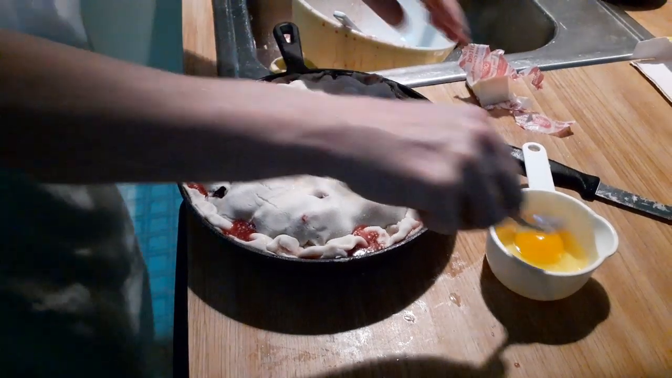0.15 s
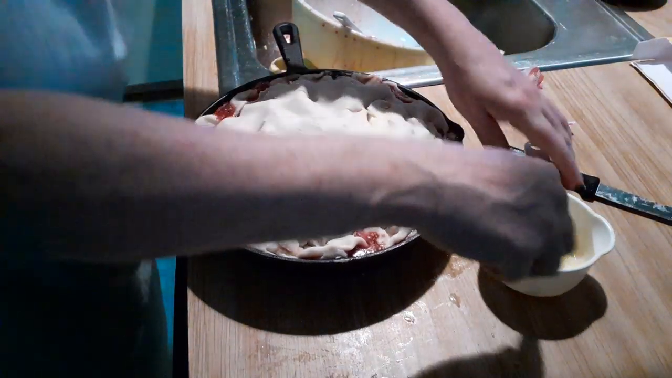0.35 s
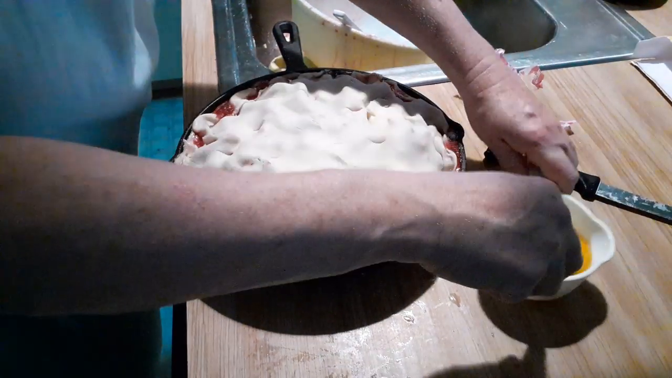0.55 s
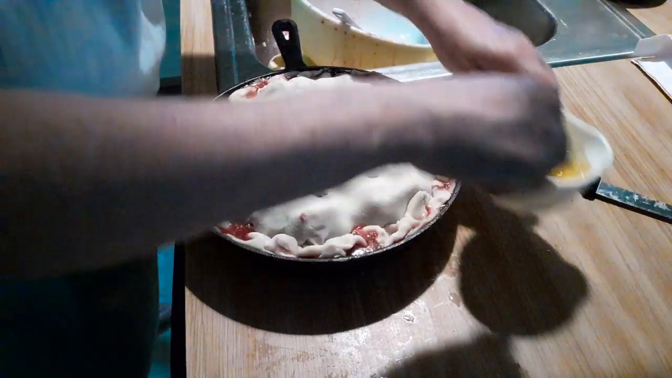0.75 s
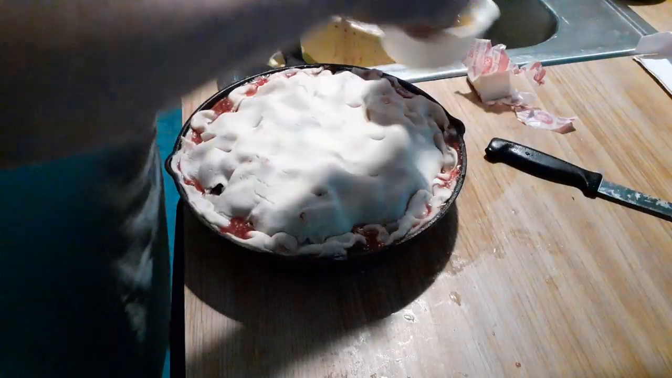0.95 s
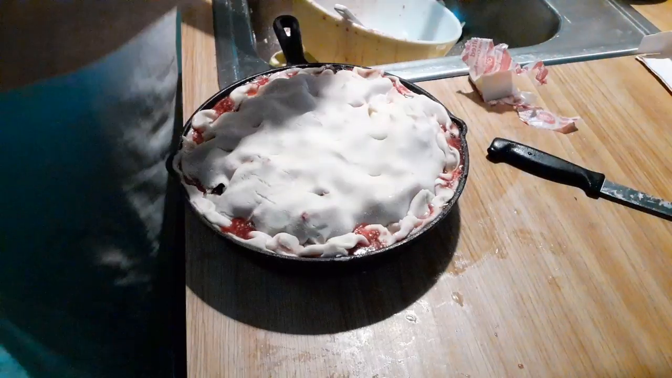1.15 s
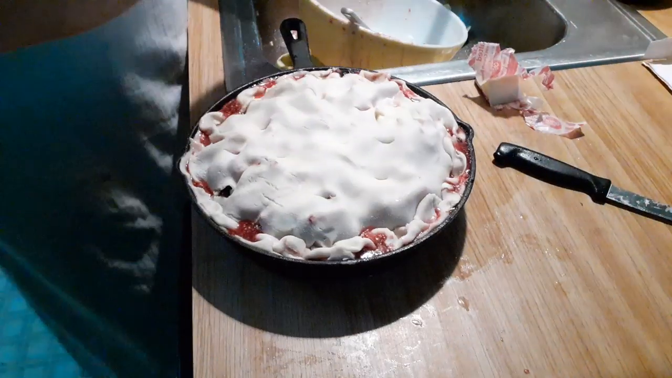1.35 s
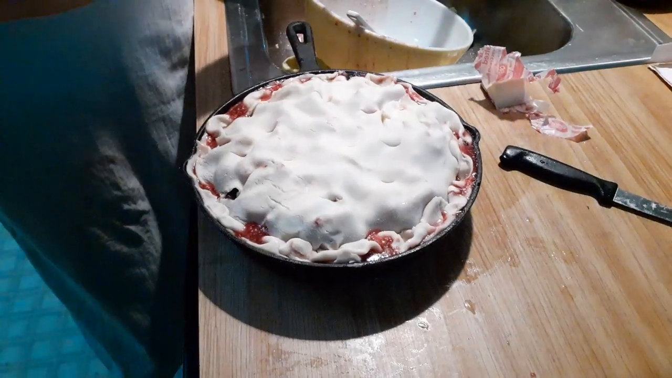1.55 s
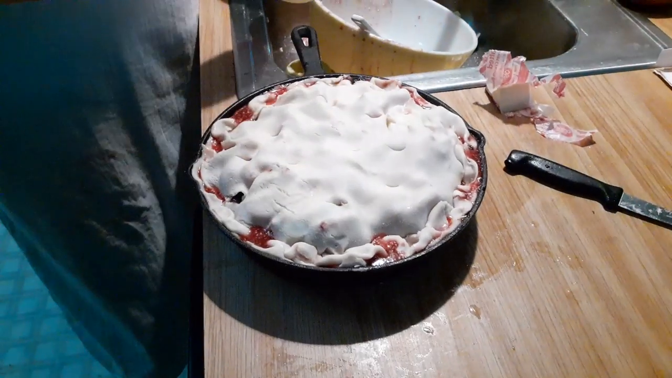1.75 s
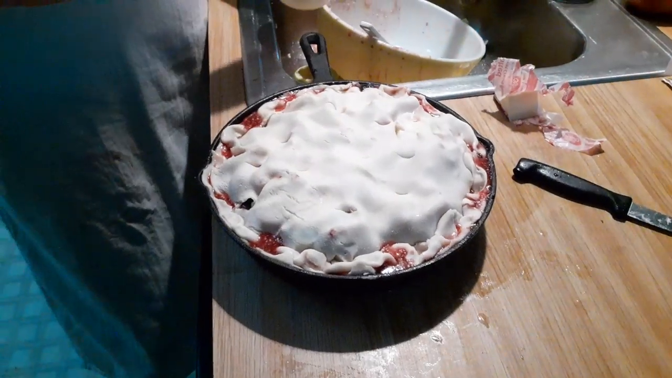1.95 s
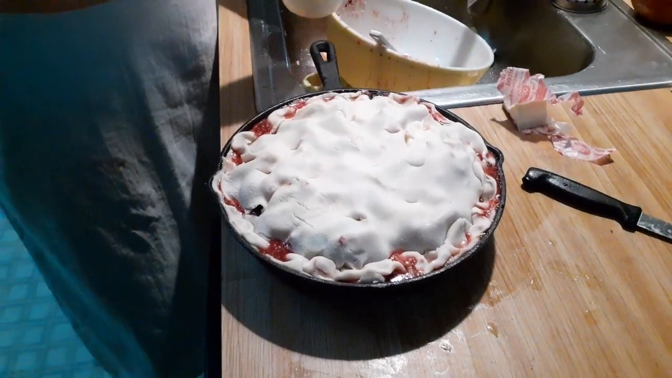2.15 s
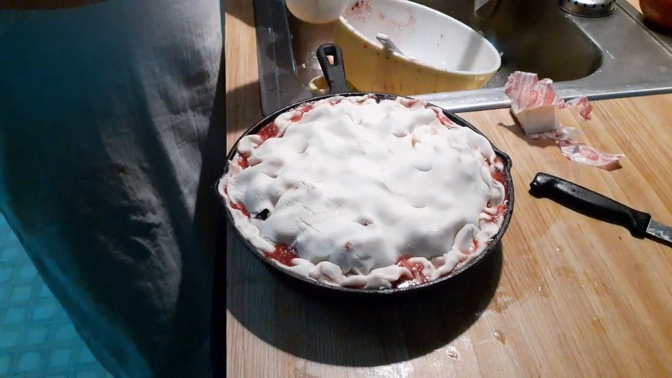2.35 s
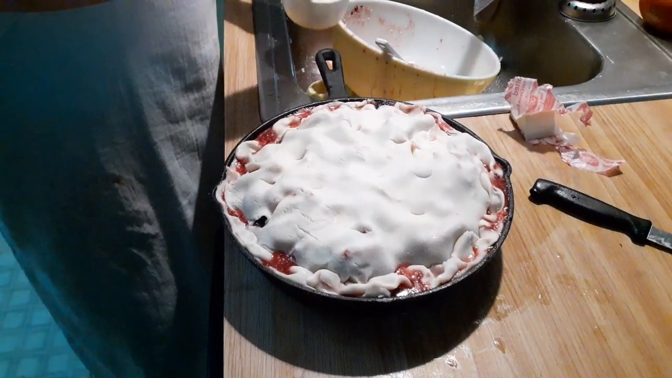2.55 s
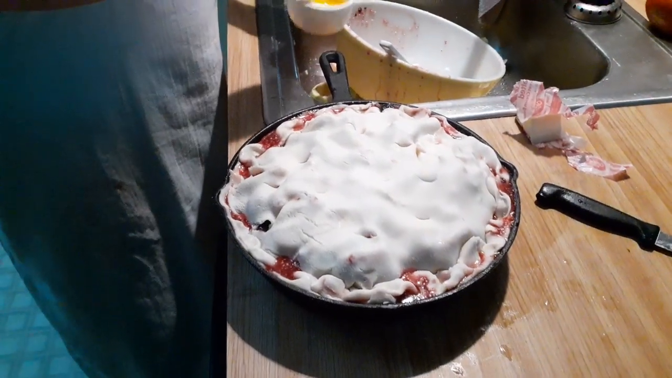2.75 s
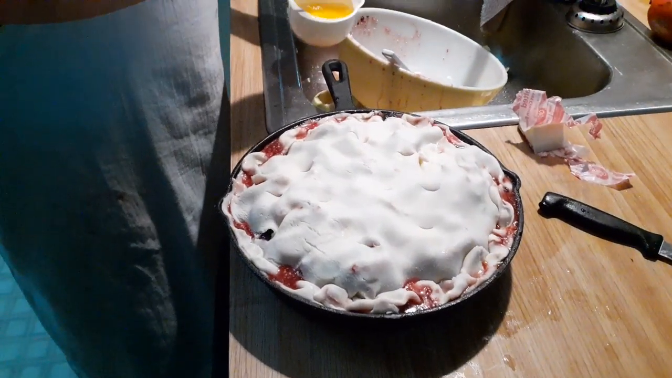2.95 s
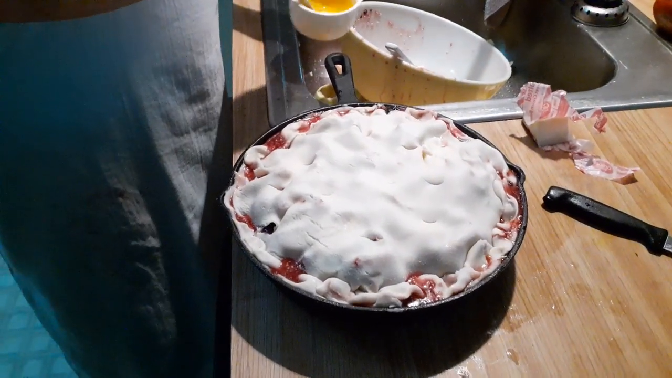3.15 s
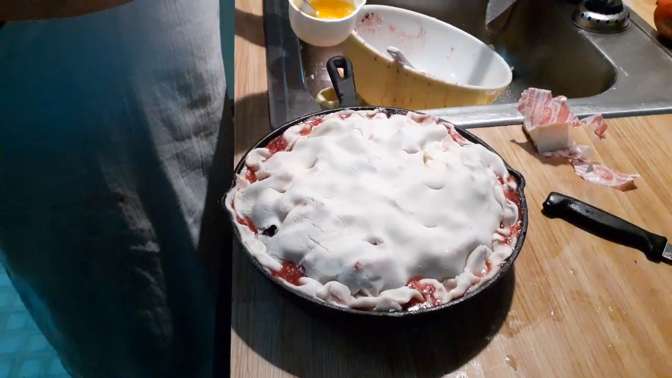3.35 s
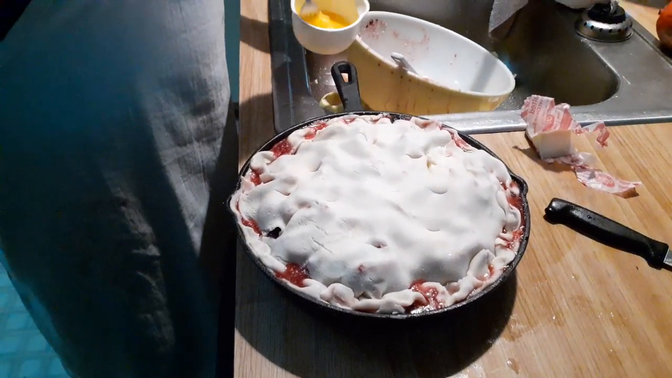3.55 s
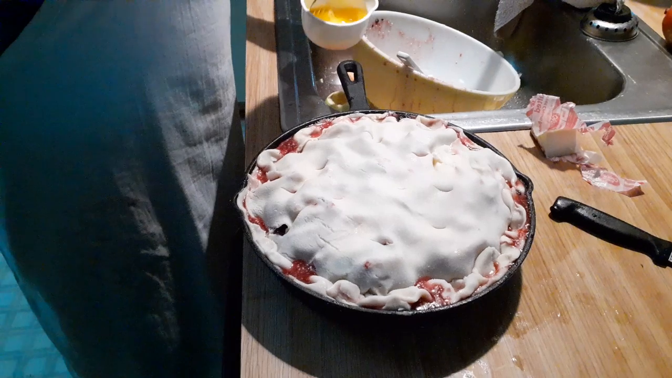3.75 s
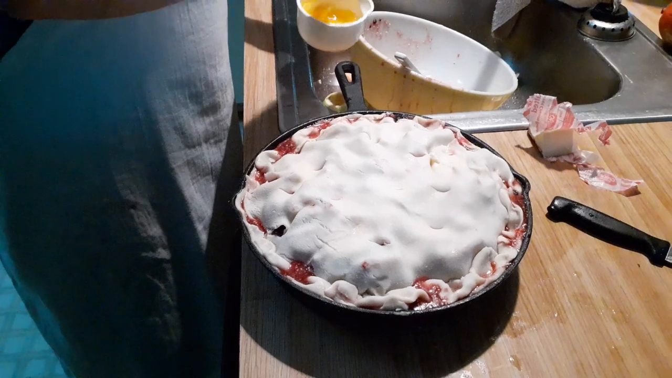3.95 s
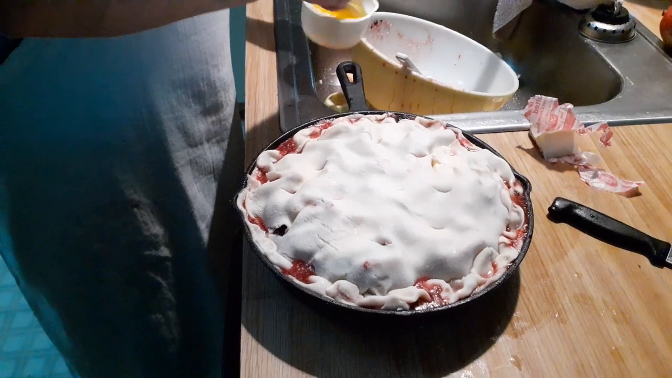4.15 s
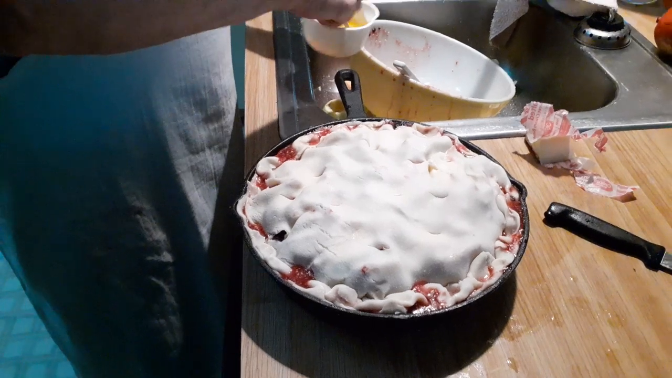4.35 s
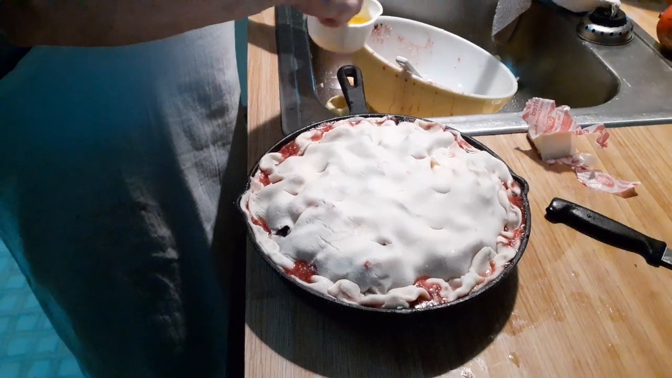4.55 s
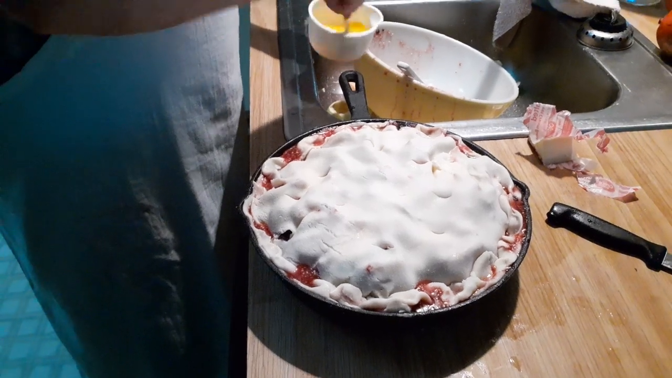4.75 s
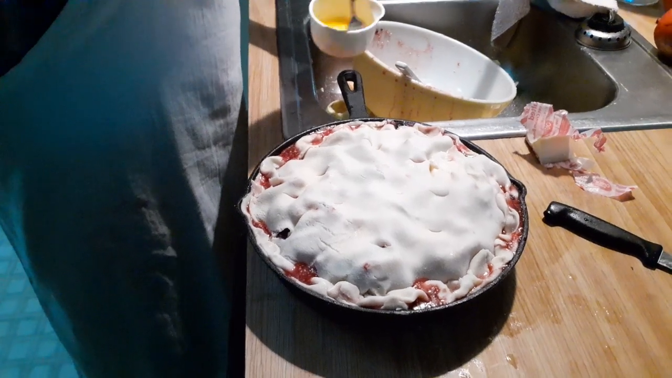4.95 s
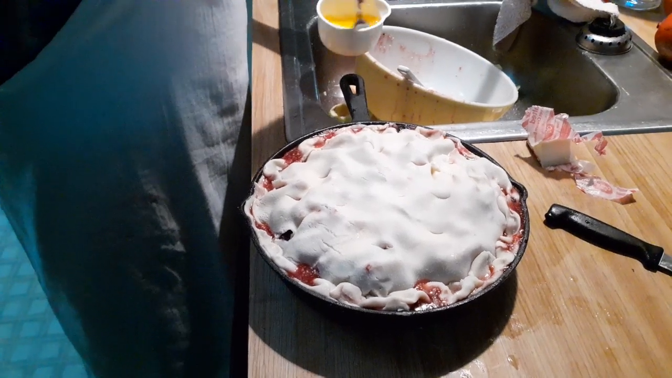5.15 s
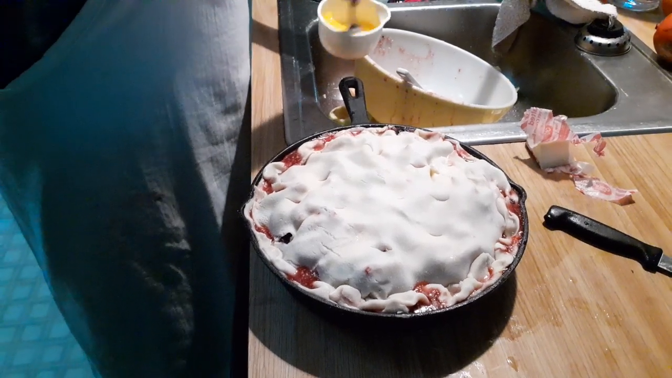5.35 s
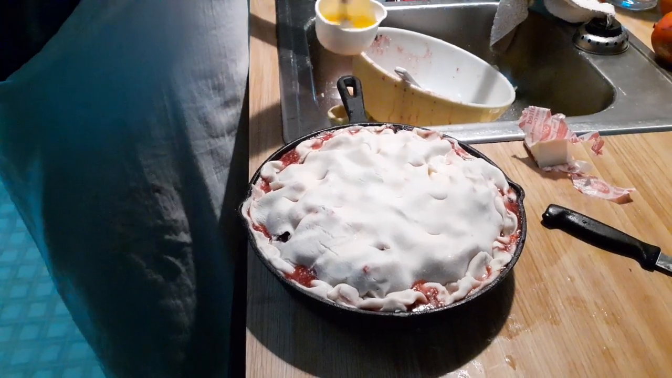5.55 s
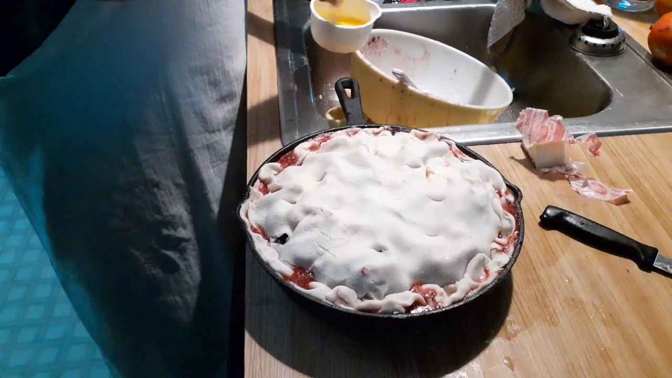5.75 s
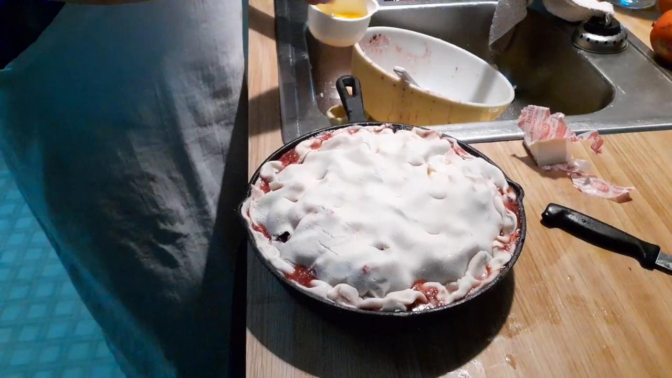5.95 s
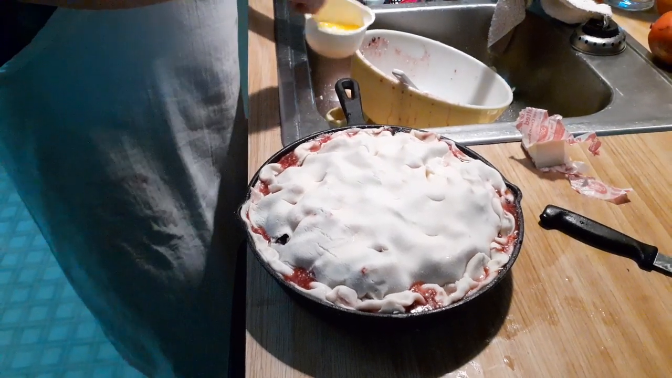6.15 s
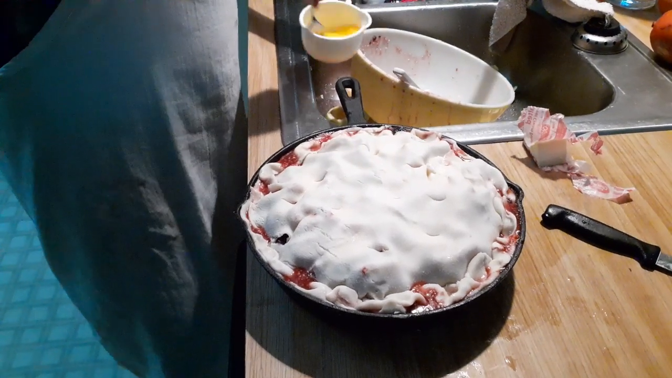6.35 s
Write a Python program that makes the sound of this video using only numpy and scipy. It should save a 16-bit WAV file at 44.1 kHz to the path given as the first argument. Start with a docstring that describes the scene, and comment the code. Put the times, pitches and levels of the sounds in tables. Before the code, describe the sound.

A fork whisks an egg briskly in a hollow little plastic cup. After a quiet start with a few ticks and two woody knocks, steady dry clicks run to the end, often doubled by a backswing hit, briefly softening twice. Liquid bubbles and plops between them. The sound is near, slightly left, in a small lively kitchen with a soft appliance hum.

```python
"""A fork beats an egg in a small plastic cup: about 5.6 rounds a second of drags, wall hits and returns.
Each contact is shaped noise for the crack plus decaying sines for the cup, coloured in five bands.
The egg plops in gliding, shaken sines and crackles in tiny bubbles; before the beating, the cup
bumps a wooden counter (decaying modes) and the hands thump softly.
A small room with a drifting pattern of reflections surrounds it, over hum and shaped hiss."""
import sys
import numpy as np
from scipy import signal
from scipy.fft import rfft, irfft, next_fast_len
from scipy.io import wavfile
from scipy.ndimage import uniform_filter1d

SR = 44100
rng = np.random.default_rng(int(sys.argv[2]) if len(sys.argv) > 2 else 0)


def generate_wav(signal):
    """Clip the signal to [-1, 1] and save it as 16-bit WAV at the path in sys.argv[1]."""
    frames = np.transpose(np.atleast_2d(signal))
    scaled = np.clip(frames, -1, 1) * 32767
    pcm = np.round(scaled).astype(np.int16)
    wavfile.write(sys.argv[1], SR, pcm)


N = 286253  # length in samples


def amp(db):
    """Turns decibels into a linear gain."""
    return 10 ** (np.asarray(db) / 20)


def evened(x):
    """Scales a signal to an RMS of one."""
    return x / np.sqrt(np.mean(x ** 2) + 1e-20)


def read(points, hz, axis=1):
    """Reads a table column, joined by straight lines over log frequency."""
    table = np.array(points)
    return np.interp(np.log(hz + 1), np.log(table[:, 0]), table[:, axis])


def add(mix, s, sound):
    """Lays a sound into the mix at time s (seconds)."""
    part = mix[..., max(round(s * SR), 0):][..., :sound.shape[-1]]
    part += sound[..., :part.shape[-1]]


def resonance(hz, centre_hz, gain, q):
    """Lifts a spectrum around one frequency, so that it rings there."""
    return 1 + gain / (1 + 1j * q * (hz / centre_hz - centre_hz / (hz + 1)))


# the two microphones: f/Hz, likeness (0-1), left minus right level/dB
MICROPHONES = [(201, 0.93, 5), (805, 0.51, 4.5), (1600, 0.29, 3.7), (2880, 0.25, 2.5), (10000, 0.17, 0.9)]


def pair(z, hz):
    """Makes left and right from two unrelated spectra: alike in the bass, apart in the treble."""
    same = np.clip(read(MICROPHONES, hz), -1, 1)
    right = same * z[0] + np.sqrt(1 - same ** 2) * z[1]
    return np.array([z[0], right])


# the fork hits the wall: t/s, level/dB, wall pitch at that spot f/Hz, treble level/dB
BLOWS = [(0.9741, -28.5, 3550, -10), (1.1402, -23, 2450, -2.5), (1.328, -28, 2570, 0),
         (1.509, -26.5, 1390, -3), (1.678, -27.5, 1450, 4.5), (1.8577, -23, 1490, -0.5),
         (2.0236, -22.5, 2120, -1.5), (2.1951, -20.5, 1350, -0.5), (2.3742, -23.5, 1720, 1),
         (2.5558, -24, 3110, -2), (2.7318, -25.0, 2230, 3.5), (2.9207, -22, 3280, -2.5),
         (3.1064, -23.5, 3200, -1.5), (3.289, -23.5, 3050, -1.5), (3.4928, -24, 3400, -0.5),
         (3.6711, -25, 3130, -3), (3.855, -25.5, 3320, -2.5), (4.0335, -22, 2110, -3.5),
         (4.2109, -23.5, 1810, -2), (4.392, -34, 1560, -1.5), (4.5662, -35, 1700, -3),
         (4.7503, -27, 1780, -3.5), (4.9743, -23.5, 3170, -7.5), (5.142, -20.5, 1580, -4.5),
         (5.3317, -24.5, 2900, -1), (5.5259, -24.5, 1560, -3.5), (5.7149, -30, 2780, 0.5),
         (5.9009, -32.5, 2780, -2), (6.1088, -35.5, 2800, 0), (6.2876, -23, 3120, -0.5)]
# it strikes again, on the backswing or bouncing off: t/s, level/dB, wall pitch f/Hz, treble level/dB
RETURNS = [(2.105, -31.5, 2800, -1.0), (2.2761, -24.5, 2670, -1), (2.4569, -25.5, 2780, 1),
           (2.6317, -20, 1870, -2), (2.8105, -22.0, 2170, 0.5), (2.9936, -21.5, 2110, -4.5),
           (3.1328, -27, 1540, -4), (3.1802, -24.5, 2190, -2.5), (3.3167, -29.5, 2640, -2),
           (3.356, -33, 2980, 1.5), (3.7208, -32, 3340, -2.5), (3.9342, -27.5, 2120, -7),
           (4.824, -27.5, 3400, -1), (5.214, -32, 3300, -7.5), (5.4026, -30.5, 2840, -6),
           (5.6081, -27, 2500, -6), (5.8119, -37.5, 2840, -6), (6.3612, -27.5, 2860, -6)]
# the tips land on the bottom and scrape towards the next blow: t/s, level/dB
DRAGS = [(0.953, -34), (1.135, -35.5), (1.3235, -44), (1.4902, -36.5), (2.548, -32), (2.7185, -29.5),
         (2.8982, -31.5), (3.0753, -30.5), (3.2652, -29), (3.8355, -35), (4.005, -31.5), (4.1856, -34),
         (4.353, -39.5), (4.5311, -40), (4.7277, -36), (4.9524, -40.5), (5.32, -34.5), (5.5016, -40.5),
         (6.0828, -34.5)]
# stray ticks as the fork enters the cup, brushes the rim or lands a tine late: t/s, level/dB
TICKS = [(0.286, -41.5), (0.335, -51.5), (0.4553, -37), (0.6236, -41), (0.7706, -33), (0.7927, -42.5),
         (0.9979, -41.5), (1.1819, -38), (1.6811, -38.5), (2.3779, -37), (2.76, -35.5), (3.087, -39),
         (4.64, -48.5), (5.343, -37), (5.724, -33), (6.197, -43.5)]
# colour of each kind of contact: one level/dB for each of the five bands
BLOW_TONE = [-34, -26.5, -22, -24.5, -15.5]
RETURN_TONE = [-29.5, -25.5, -22.5, -24.5, -15.5]
TIP_TONE = [-25, -25, -22.5, -23.5, -15]
TICK_TONE = [-27, -31.5, -24.5, -22, -15]
TIP_HZ, TICK_HZ = 4730, 2560  # resonance of the tips on the bottom and on the rim
TOGETHER_S, ONE_BY_ONE_S = 0.00473, 0.0129  # time over which the tines land: guided, and in a free swing


def beating(guide_s=0.05, scrape_db=-13):
    """Lists each contact as click() takes it; a drag lines up the tines for the blow that follows."""
    contacts = [(s, db, TICK_HZ, TICK_TONE, TOGETHER_S) for s, db in TICKS]
    for s, db in DRAGS:
        until_blow = min(blow[0] - s for blow in BLOWS if blow[0] > s)
        contacts.append((s, db, TIP_HZ, TIP_TONE, TOGETHER_S, until_blow, scrape_db))
    top_band = np.eye(len(BANDS))[-1]
    for s, db, hz, treble_db in BLOWS:
        guided = any(0 < s - drag[0] < guide_s for drag in DRAGS)
        spread = TOGETHER_S if guided else ONE_BY_ONE_S
        contacts.append((s, db, hz, BLOW_TONE + treble_db * top_band, spread))
    for s, db, hz, treble_db in RETURNS:
        contacts.append((s, db, hz, RETURN_TONE + treble_db * top_band, TOGETHER_S))
    return contacts


LEAD = 0.008  # silence before each contact (s)


def strike_force(t, spread, scrape, scrape_db, rise, count, snap=0.0018, tine_db=-7,
                 chatter=0.017, chatter_db=-10, rattle_db=6, slip_db=6, skid=0.013):
    """The first tine snaps and chatters, others land after it, and the tips may scrape (times in s)."""
    age = np.maximum(t, 0)
    uneven = evened(uniform_filter1d(rng.standard_normal(len(t)), size=50))
    rattle = evened(amp(rattle_db * uneven))
    first = np.exp(-age / snap) + amp(chatter_db) * rattle * np.exp(-age / chatter)
    first = first * (1 - np.exp(-age / rise))
    later = np.maximum(t - spread * rng.random((count, 1)), 0)
    others = np.linalg.norm((1 - np.exp(-later / rise)) * np.exp(-later / snap), axis=0)
    stick_slip = evened(amp(slip_db * uneven)) * (t > 0) * (t < scrape) * np.exp(-age / skid)
    return np.hypot(first, amp(tine_db) * others) + amp(scrape_db) * stick_slip


# the cup with the fork on it: f/Hz, relative level/dB, t60/s
CUP = [(579.5, -2.5, 0.097), (913, -31, 0.11), (1330.5, 1.5, 0.068), (1568, 6.5, 0.041), (1732, -6, 0.04),
       (2360, 0, 0.032), (3057, -4.5, 0.034), (4304, -4, 0.059)]


def cup_ring(age, rise, spot_db=3):
    """Sums the cup's decaying modes, in a new mix and tuning for each contact."""
    mode_hz, mode_db, t60 = np.transpose(CUP)[:, :, None]
    shape = (len(CUP), 1)
    detune = 1 + 0.0393 * rng.standard_normal(shape)  # the sloshing egg loads the wall
    weight = amp(mode_db + spot_db * rng.standard_normal(shape))
    phase = rng.random(shape) + 0.5 * rng.random((2, *shape))  # in turns, different left and right
    modes = weight * amp(-60 * age / t60) * np.sin(2 * np.pi * (mode_hz * detune * age + phase))
    return modes.sum(1) * (1 - np.exp(-age / rise))


# the crack of the contact: f/Hz, relative level/dB per Hz
CRACK = [(60, -31), (180, 0.5), (420, -0.5), (600, 6), (1000, 3.5), (1600, 6), (2000, -4), (4400, -6),
         (7400, -11), (8500, -4), (10500, -12.5), (15500, -16)]
# the five bands that colour a contact: low edge f/Hz, high edge f/Hz
BANDS = [(400, 1100), (1100, 2000), (2000, 3600), (3600, 7000), (7000, 16000)]
# where the wall's short resonances lie: lowest f/Hz, highest f/Hz
SPOT_RANGE_HZ = (1300, 7000)


def click(body_db, level_db, wall_hz, tone_db, spread, scrape=0, scrape_db=-np.inf,
          wall_gain=1.32, wall_q=8, spot_gain=0.83, spot_q=8, rise=0.00011, ring_db=-5,
          count=3, size=8192):
    """Tines drive a noisy crack and the cup's modes; each spot on the wall has its own resonances."""
    t, hz = np.arange(size) / SR - LEAD, np.fft.rfftfreq(size, 1 / SR)
    force = strike_force(t, spread, scrape, scrape_db, rise, count)
    crack = rfft(force * rng.standard_normal((2, size))) * amp(read(CRACK, hz))
    for spot_hz in np.exp(rng.uniform(*np.log(SPOT_RANGE_HZ), count)):
        crack = crack * resonance(hz, spot_hz, spot_gain, spot_q)
    ring = cup_ring(np.maximum(t, 0), rise)
    z = pair(rfft(evened(irfft(crack)) + amp(ring_db) * evened(ring)), hz)
    # move each band from its own level to that of the tone; the lowest band is the body
    power = abs(z.mean(0)) ** 2
    band_power = [power[(hz > low) & (hz < high)].sum() / size ** 2 for low, high in BANDS]
    own_db = 10 * np.log10(band_power)
    wanted_db = tone_db + body_db * np.eye(len(BANDS))[0]
    centres = np.sqrt(np.prod(BANDS, axis=1))
    colour_db = read(np.c_[centres, wanted_db - own_db], hz)
    return irfft(z * resonance(hz, wall_hz, wall_gain, wall_q) * amp(level_db + colour_db))


# the cup's hollow body, the lowest band of every contact: t/s, added level/dB
BODY = [(0.8, 0.5), (2.27, 4), (2.55, 0), (3.93, -3), (4.21, 5), (4.75, -5.5), (6.36, -1)]


def fork(contacts):
    """Plays all contacts of the fork with the cup, with a body that changes over time."""
    out = np.zeros((2, N))
    for s, *contact in contacts:
        body_db = np.interp(s, *np.transpose(BODY))
        add(out, s - LEAD, click(body_db, *contact))
    return out


# air pockets in the egg: t/s, level/dB before shaking, centre pitch f/Hz
PLOPS = [(1.572, -36.5, 1570), (3.179, -25.5, 1765), (3.358, -29.5, 1238), (3.505, -24, 1557),
         (4.034, -32.5, 930), (4.096, -29, 1330), (4.354, -35, 1242), (4.534, -36.5, 1097),
         (4.824, -25, 1421), (4.897, -38, 1366), (4.952, -32, 1754), (5.147, -41, 1500),
         (5.403, -26.5, 1524), (5.61, -28.5, 1612), (6.109, -32, 1485), (6.361, -22, 1438)]


def egg(swell=0.0046, lag=0.017, scatter=0.16, splinter_db=-14, count=4):
    """Each air pocket swells and closes; quieter, shorter bubbles split off after it (times in s)."""
    out = np.zeros(N)
    for s, db, hz in PLOPS:
        add(out, s, plop(db, hz, swell))
        for _ in range(count):
            start = s + lag * rng.exponential()
            pitch = hz * np.exp(scatter * rng.standard_normal())
            add(out, start, plop(db + splinter_db, pitch, swell / 2))
    return out


def plop(level_db, pitch, swell, rough=0.7, glide=0.031):
    """One bubble is a sine of slightly rising pitch, shaken by the liquid."""
    t = np.arange(SR // 16) / SR
    u = t / swell
    shake = evened(uniform_filter1d(rng.standard_normal((2, len(t))), size=100))
    turns = np.cumsum(pitch * (1 + glide * np.tanh(u - 1))) / SR
    bubble = (1 + rough * (shake[0] + 1j * shake[1])) * np.exp(2j * np.pi * turns)
    return amp(level_db) * u * np.exp((1 - u ** 2) / 2) * bubble.real


def slosh(contacts, level_db=-8, per_s=170, linger=0.032, cycles=7, count=24):
    """After each contact the egg falls back from the tines in a wet crackle of tiny decaying sines."""
    blows, t = np.zeros(N), np.arange(SR // 5) / SR
    for s, db, *_ in contacts:
        blows[round(s * SR)] = amp(db)
    swell = t / linger * np.exp(1 - 2 * t / linger)
    stir = signal.oaconvolve(blows, swell)[:N]
    out = np.zeros((2, N))
    for hz in np.geomspace(1400, 11000, count):
        # per_s is the rate of all the pitches together
        bursts = stir * rng.exponential(1.0, N) * (rng.random(N) < per_s / count / SR)
        turns = hz * t[:2000]
        bubble = np.exp(-2 * turns / cycles) * np.sin(2 * np.pi * turns)
        out += signal.oaconvolve(bursts, bubble)[:N]
    return amp(level_db) * out


# the cup bumps the counter as it is lifted: t/s, level/dB, pitch relative to the wood's modes
KNOCKS = [(0.6389, -21.5, 0.94), (0.771, -23, 1)]
# the wooden counter: f/Hz, relative level/dB, t60/s
WOOD = [(260, -7, 0.03), (640, -5, 0.0043), (930, 4, 0.0075), (1360, -19, 0.011)]
# soft thumps of the hands: t/s, level/dB, f/Hz, t60/s
THUMPS = [(0.286, -44, 211, 0.25), (0.459, -35, 61.6, 0.09)]


def counter(swell=0.00046, scuff=0.0085, scuff_db=-25, low_hz=380):
    """An impulse and a brief noisy scuff ring the wood's modes; the hands give soft decaying sines."""
    out, t = np.zeros(N), np.arange(SR // 3) / SR
    high_pass = signal.butter(2, low_hz, "high", fs=SR)
    for s, db, pitch in KNOCKS:
        wood = sum(amp(mode_db - 60 * t / t60) * np.sin(2 * np.pi * pitch * hz * t)
                   for hz, mode_db, t60 in WOOD)
        scuffing = amp(scuff_db) * np.exp(-t / scuff) * rng.standard_normal(len(t))
        force = signal.unit_impulse(len(t)) + scuffing
        add(out, s, amp(db) * signal.oaconvolve(force, signal.lfilter(*high_pass, wood)))
    for s, db, hz, t60 in THUMPS:
        add(out, s, amp(db - 60 * t / t60) * (1 - np.exp(-t / swell)) * np.sin(2 * np.pi * hz * t))
    return out


def moving_room(x, turn_hz=0.9, count=6):
    """The cup moves in the hand: crossfades between rooms keep changing the pattern of reflections."""
    phase = turn_hz * np.arange(N) / SR
    shares = [np.maximum(np.cos(2 * np.pi * (phase + k / count)) - 0.5, 0) for k in range(count)]
    shares = np.array(shares)
    return sum(kitchen(x * share) for share in shares / np.linalg.norm(shares, axis=0))


# the room's diffuse tail: f/Hz, t60/s
ROOM = [(250, 0.44), (650, 0.27), (3700, 0.28), (12000, 0.23)]
# reflections off sink and counter: nominal delay t/s, gain (linear)
ECHOES = [(.0037, 0.23), (.0061, 0.2), (0.0105, .16)]


def kitchen(x, wet_db=-9.5, build=0.0091, shift=0.12):
    """Near reflections, and a diffuse noise tail that builds up, then dies sooner in the treble."""
    size = SR // 2
    hz, t, z = signal.stft(rng.standard_normal((2, size)), SR, nperseg=256)
    z = pair(z, hz[:, None]) * amp(-60 * t / read(ROOM, hz)[:, None])
    tail = signal.istft(z, SR, nperseg=256)[1][:, :size]
    tail = tail * (1 - np.exp(-(np.arange(size) / SR / build) ** 2))
    tail *= amp(wet_db) / np.linalg.norm(tail[0])
    for delay, gain in ECHOES:
        s = delay * (1 + shift * rng.uniform(-1, 1))
        for ear, lag in zip(tail, (0, 2 / SR)):  # the right side hears it two samples later
            add(ear, s + lag, gain * np.array([0.8, 0.3]))
    return signal.oaconvolve(x, tail, axes=1)[:, :N]


# lines of the appliance hum: f/Hz, level/dB
HUM = [(65.5, -70), (229, -67.5), (296.5, -66)]
# spectrum of the kitchen's background noise: f/Hz, relative level/dB per Hz
FLOOR = [(40, -33), (66, -1), (90, -14.5), (235, -2.5), (330, -7.5), (680, -11), (1100, -24.5), (1600, -34),
         (1750, -18), (1950, -31), (2900, -28), (3200, -18), (3700, -37), (6200, -30), (8500, -24.5),
         (16000, -33)]
# the background noise over time: t/s, level/dB
FLOOR_LEVEL = [(0, -65), (0.498, -59.5), (3.5, -58.5), (6.402, -55.5)]


def background():
    """Appliance hum of steady sines, and faint shaped noise whose level drifts."""
    t, hz = np.arange(N) / SR, np.fft.rfftfreq(N, 1 / SR)
    noise = irfft(pair(rfft(rng.standard_normal((2, N))), hz) * amp(read(FLOOR, hz)), N)
    hum = sum(amp(db) * np.sin(2 * np.pi * (f * t + rng.random())) for f, db in HUM)
    return hum + evened(noise) * amp(np.interp(t, *np.transpose(FLOOR_LEVEL)))


def scene():
    """Fork, egg and counter, close and in the room, over the background."""
    contacts = beating()
    near = fork(contacts) + egg() + slosh(contacts) + counter()
    return near + moving_room(near) + background()


def record(dry, low_cut_hz=52, edge_hz=15850):
    """Tilts the level between left and right by frequency, then cuts the lows and limits the band."""
    size = next_fast_len(N + 4096)
    lean_db = read(MICROPHONES, np.fft.rfftfreq(size, 1 / SR), axis=2)
    heard = irfft(rfft(dry, size) * amp(np.array([lean_db, -lean_db]) / 2), size)[:, :N]
    heard = signal.sosfilt(signal.butter(4, low_cut_hz, "high", fs=SR, output="sos"), heard)
    low_pass = signal.firwin(401, edge_hz, window=("kaiser", 8), fs=SR)
    return signal.oaconvolve(heard, low_pass[None], "same")


dry = scene()
out = record(dry)
generate_wav(out)
```